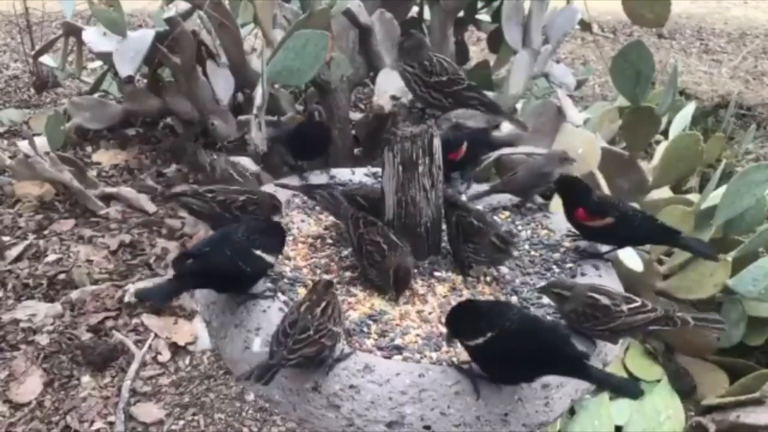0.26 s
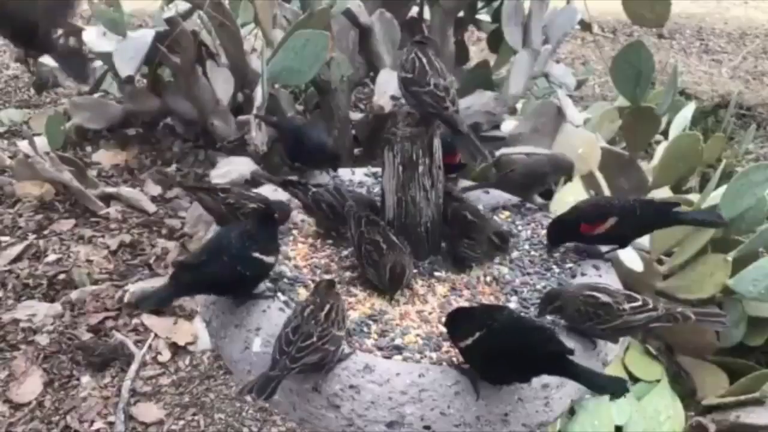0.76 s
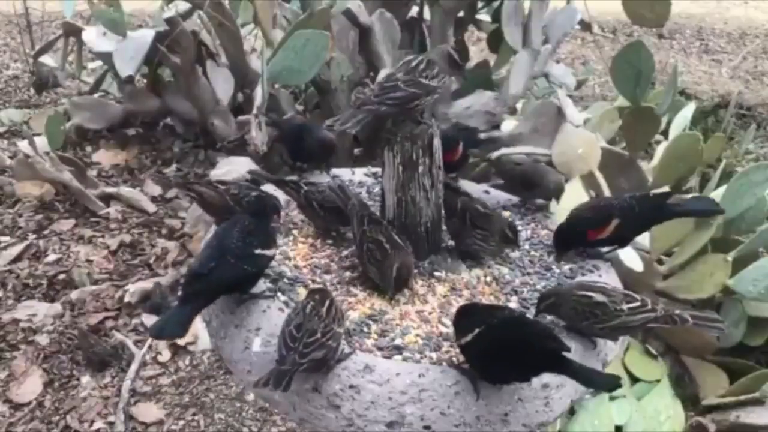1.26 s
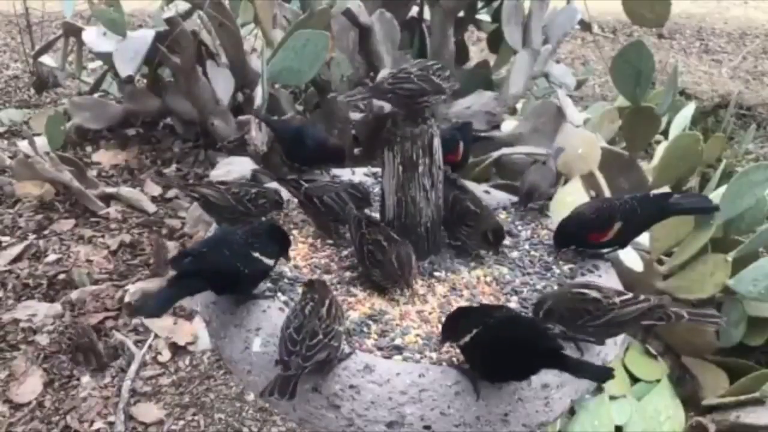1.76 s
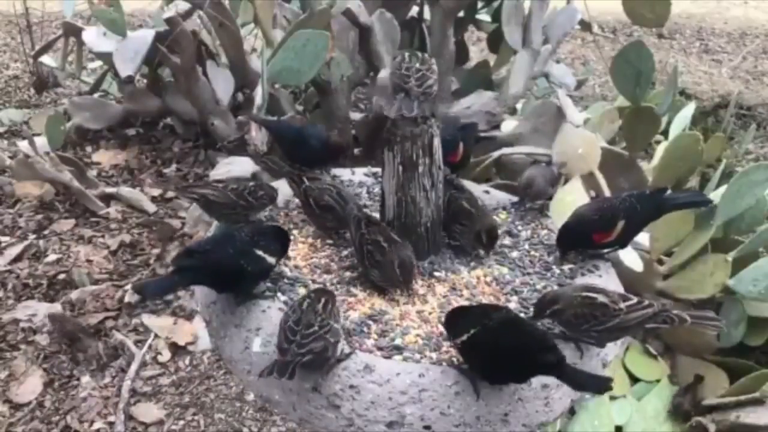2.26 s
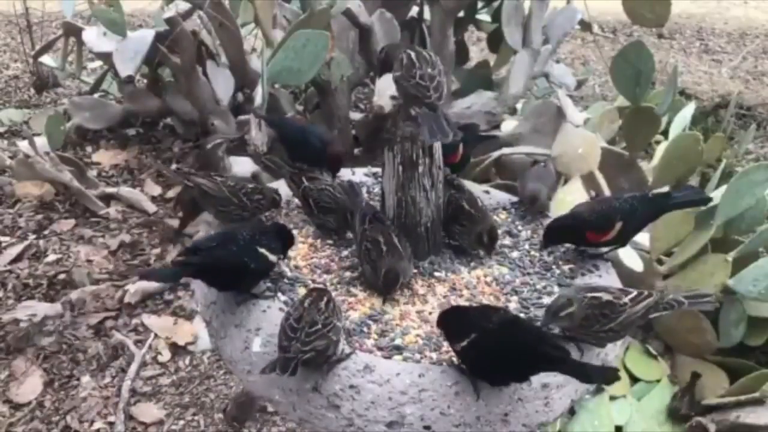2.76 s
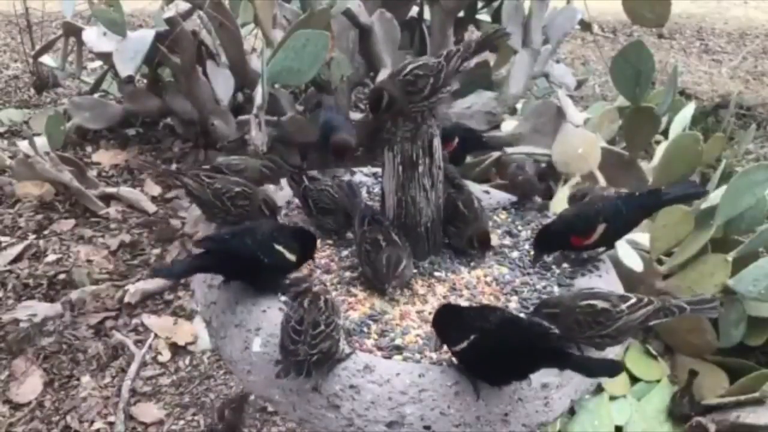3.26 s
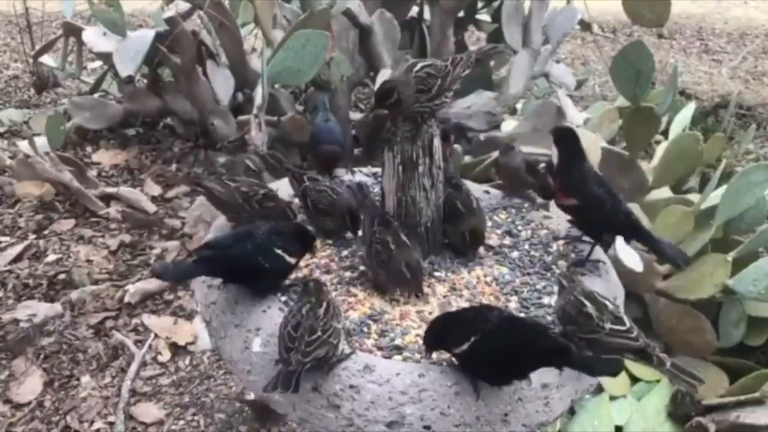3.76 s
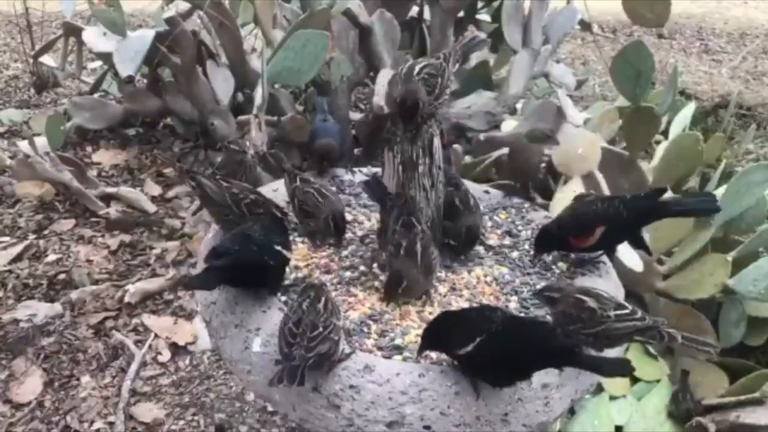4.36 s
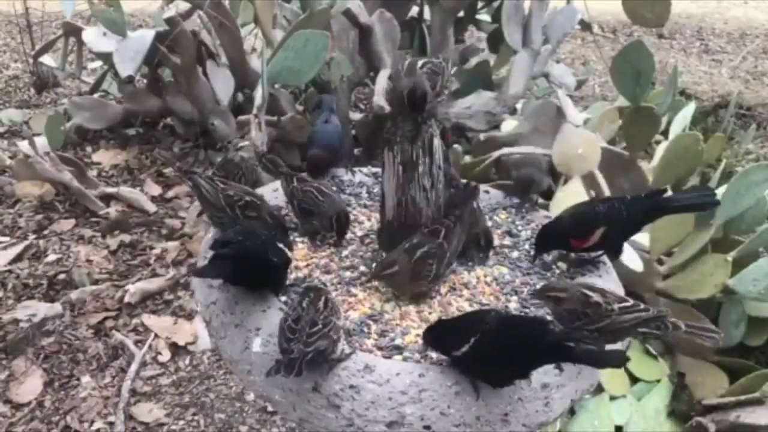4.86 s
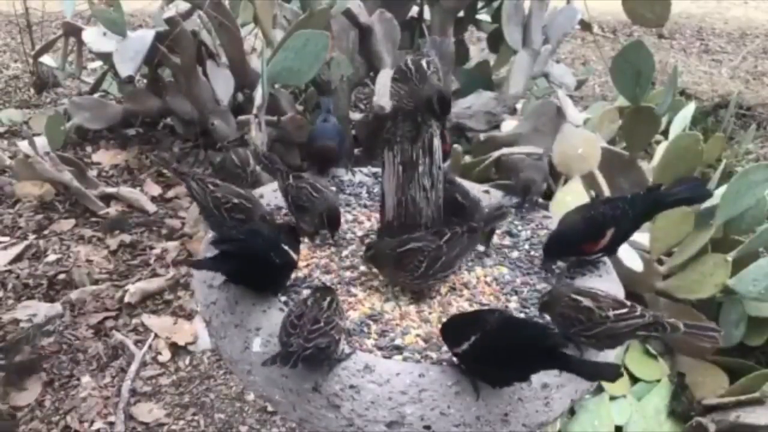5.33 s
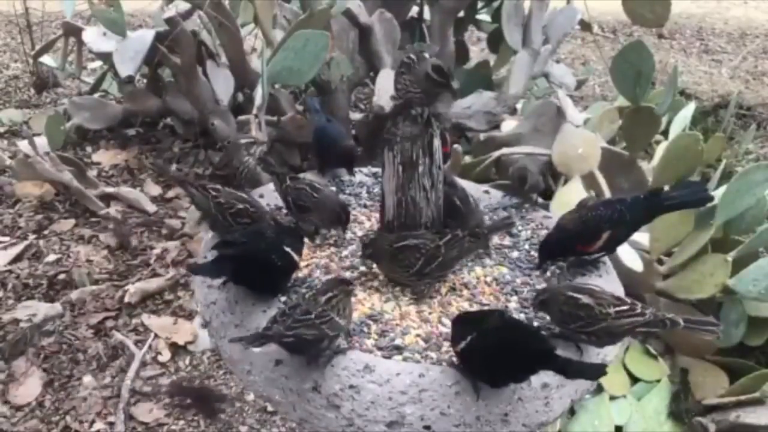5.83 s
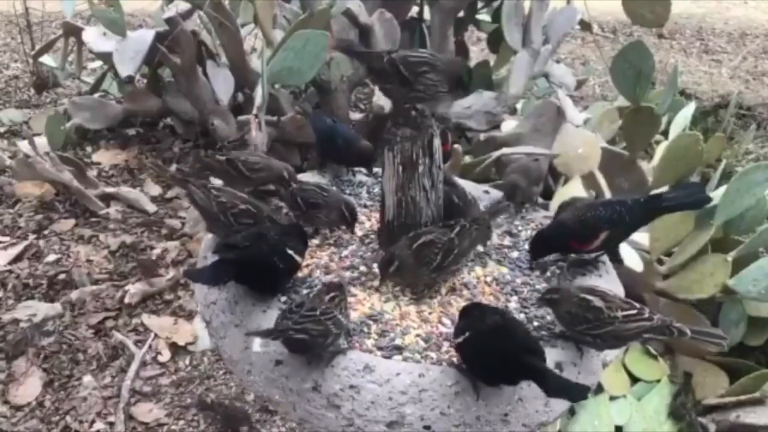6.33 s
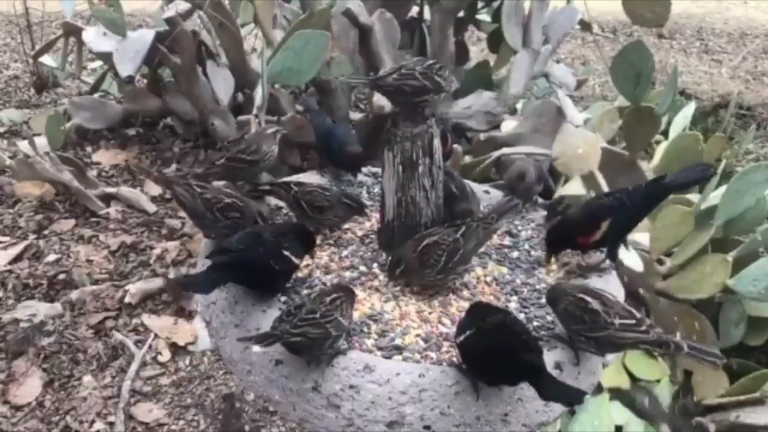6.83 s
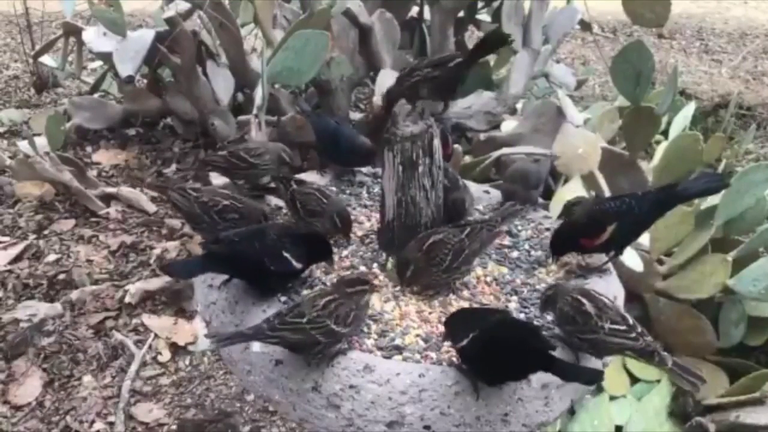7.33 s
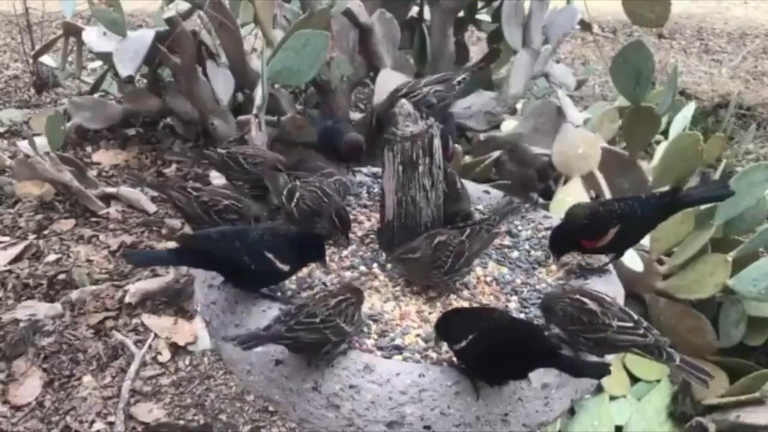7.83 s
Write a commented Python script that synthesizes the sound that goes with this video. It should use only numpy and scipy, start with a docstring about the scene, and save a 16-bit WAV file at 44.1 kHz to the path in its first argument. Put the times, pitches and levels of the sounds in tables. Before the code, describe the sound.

Close, dry taps of beaks and rustling seed as a flock of blackbirds feeds outdoors, with scattered chips and a few harsh calls.

```python
"""Outdoors, one microphone close to a stone bowl of seed where blackbirds feed, over a low rumble and hiss.
It opens on a sharp peck, a whistle and a flutter of wings; from there on beaks tap and crack husks, feet
shuffle the grain, short arched chips pass through the flock, and now and then a bird flutters again.
From about 3 s come harsh check calls, a thin whistle and, farther off, low trilled churrs.
Near 4 s the hum of a distant engine comes up and stays under the feeding to the end."""
import sys
import numpy as np
from scipy import signal
from scipy.fft import rfft, irfft, next_fast_len
from scipy.io import wavfile
from scipy.ndimage import map_coordinates

SR = 44100
rng = np.random.default_rng(int(sys.argv[2]) if len(sys.argv) > 2 else 0)


def file_out(sig):
    """Save sig as 16-bit WAV at sys.argv[1]."""
    # one column per channel
    cols = np.atleast_2d(sig).T
    # limit, then scale
    lim = np.clip(cols, -1, 1)
    pcm = np.round(lim * 32767).astype(np.int16)
    wavfile.write(sys.argv[1], SR, pcm)


N = 356769
TOP_HZ = 13250  # upper edge of the microphone's band

# Levels are relative: each source applies its own gain and envelope.
# loudest beak strikes, close up: t/s, level/dB, ring f/Hz, snap against ring/dB
BEAK_STRIKES = [(0.1267, -3, 3000, 8), (.207, -16, 5930, -9), (.430, -16.5, 4270, -13),
                (.782, -13.5, 3030, -5), (.807, -18, 12000, -4), (.961, -18, 3200, -6),
                (1.144, -12.5, 4300, 4), (1.472, -13, 6800, -3), (1.602, -15, 5600, 2),
                (2.193, -13, 5500, 0), (2.472, -9.5, 1690, 4), (2.544, -16, 11800, 13),
                (2.632, -15, 1810, 5), (2.696, -2.5, 2160, 4.5), (3.279, -7.5, 8400, -15),
                (3.659, -16, 2800, -4), (3.865, -13.5, 3980, -2), (3.904, -16, 4500, -4),
                (4.142, -6, 2320, 4), (4.199, -13, 9450, -11), (4.429, -7, 4100, -4),
                (4.486, -4, 4830, -29), (4.508, -10, 2370, 6), (4.662, -5.5, 3000, 12),
                (4.770, -12, 2180, 6), (5.304, -18.5, 3300, -17), (5.399, -8, 3700, -4),
                (5.783, -14, 3980, -4), (6.185, -10, 8900, -10), (6.313, -11.5, 3060, 2),
                (6.368, -8, 3300, -1), (6.588, -9.5, 1820, -4), (6.615, -14, 11700, 3),
                (6.721, -14, 4000, 7), (6.753, -12, 7900, -3), (6.779, -6, 1706, 18.5),
                (6.796, -5, 1910, 12), (6.977, -13.5, 4700, 8), (7.103, -9, 2160, -11),
                (7.275, -13, 5800, -2), (7.293, -8.5, 2380, 4), (7.329, -15, 2500, -4),
                (7.378, -12, 9800, 0), (7.423, -9, 3020, 3)]
# spectrum of a dry husk snapping: f/Hz, level/dB
HUSK_SPECTRUM = [(300, -22), (1500, 2), (4000, 10), (7000, 11.5), (9500, 16.5), (10800, -8), (12500, 25),
                 (13600, -22)]
# short arched chips: top t/s, top f/Hz, fall/s, level/dB, octave on the way up/dB, roughness/0-1
CHIP_CALLS = [(.571, 2770, 0.017, -34, -8, 0.67), (.643, 2570, 0.0091, -38.5, -7, 0.41),
              (1.035, 3500, 0.0031, -19, -11, .1), (1.218, 2700, .008, -37, -2, .4),
              (1.563, 2760, 0.0087, -34.5, -12, 0.54), (1.631, 3360, 0.014, -17.5, -17, 0.28),
              (2.215, 3730, 0.0073, -16, 8, 0.42), (2.489, 3020, 0.0068, -23.5, -17, 0.35),
              (2.822, 3210, .018, -19, -1, .5), (2.893, 3050, 0.017, -31, -3, 0.5),
              (3.038, 3410, 0.0057, -23, -10, .37), (3.615, 3510, 0.0043, -21, -6, 0.2),
              (3.680, 3190, .016, -24.5, 0, 0.54), (4.267, 2950, 0.021, -31, 1.5, .44),
              (4.427, 3250, 0.0054, -26.5, -11, 0.3), (4.829, 3090, 0.0044, -11.5, -23, 0.37),
              (5.221, 3190, 0.0042, -25, 0, 0.22), (5.475, 2580, 0.015, -27, -12, 0.32),
              (5.637, 2890, 0.023, -19, -27, 0.3), (6.466, 3090, 0.0169, -21, -12, 0.23),
              (6.577, 3035, 0.019, -17, -21, 0.39), (7.709, 2250, .012, -28, -1, 0.27),
              (8.028, 3080, 0.015, -26.5, -14, 0)]
# resonance of throat and beak in a chip: f/Hz, level/dB
CHIP_TRACT = [(700, -16), (1300, -0.5), (2000, -2.5), (2900, 2), (4500, -3.5), (6000, -7), (7500, -15),
              (12000, -7)]
# longer, harsh check calls: top t/s, top f/Hz, arch half-width/s, level/dB
CHECK_CALLS = [(2.955, 1493, 0.0055, -25.5), (3.176, 1467, 0.021, -12), (5.432, 1533, 0.022, -12),
               (5.899, 1497, 0.015, -27.5), (7.428, 1497, 0.0073, -22)]
# resonance of the throat with the beak open: f/Hz, level/dB
CHECK_TRACT = [(800, -34), (1700, -9), (2300, 1), (2950, 3.5), (3600, 5), (4500, 0.5), (5800, 1.5),
               (6700, -8), (9000, -13), (13000, -21)]
# whistles, silent if the end precedes the start:
# start t/s, turn t/s, end t/s, level/dB, start f/Hz, turn f/Hz, end f/Hz, quaver/dB
WHISTLE_NOTES = [(0.1573, .171, 0.18, -10.5, 4800, 5370, 4200, -0.5),
                 (.176, .184, .195, -27, 5400, 5350, 5250, 3),
                 (3.03, 3.066, 3.117, -32.5, 6860, 6100, 6300, 3.5),
                 (3.212, 3.238, 3.19, -32, 8750, 8760, 8880, 8.5)]
# churrs from farther off: start t/s, length/s, level/dB, f/Hz, harshness/dB, low body/dB
CHURR_CALLS = [(3.564, .1, -43.5, 1250, -3, 0), (3.956, 0.16, -34.5, 1228, 7, -22),
               (4.361, 0.14, -41, 1215, 2, -1), (4.686, .125, -35.5, 1372, -4, -2.5),
               (5.907, .118, -33.5, 1337, -5, -4), (7.139, 0.098, -30.5, 1376, -15, -10)]
# spectra of a churr's hiss and of its low body: f/Hz, level/dB
RASP_SPECTRUM = [(700, -31), (1100, -3), (1600, -7), (2200, -9), (2950, -2.5), (3500, -5), (4500, -4.5),
                 (6500, -14), (10000, -19)]
BODY_SPECTRUM = [(250, -12), (450, -7.5), (700, 1.5), (1100, -1), (1700, -9), (2200, -41)]
# short flutters: first wingbeat t/s, length/s, air push level/dB, feather swish level/dB
WING_FLUTTERS = [(0.117, .04, -26, -37), (0.269, 0.18, -26, -35.5), (0.969, 0.307, -34, -32.5),
                 (2.282, 0.19, -32, -38.5), (6.631, 0.4, -50, -38.5)]
# spectrum of swishing feathers: f/Hz, level/dB
FEATHER_SPECTRUM = [(100, 1), (220, 5), (450, -5.5), (1100, -0.5), (2500, -6.5), (6000, -19), (13000, -21)]
# how busily the flock shuffles the seed: t/s, level/dB
BUSTLE_LEVEL = [(0.0, -39), (0.2, -36.5), (0.52, -41), (1.06, -39), (1.35, -40), (3.2, -39), (3.42, -41.5),
                (3.87, -40), (4.08, -37.5), (4.6, -39.5), (4.82, -37.5), (5.11, -38.5), (5.9, -36.5),
                (6.51, -40), (7.01, -39.5), (7.23, -38.5), (7.61, -40), (8.09, -37.5)]
# feet scuffing in the bowl: t/s, half-length/s, level/dB
FOOT_SCUFFS = [(1.455, 0.024, -31.5), (1.731, 0.024, -32), (3.908, 0.0064, -31), (4.486, 0.007, -25.5),
               (4.7, 0.025, -29), (4.904, 0.061, -32.5), (6.205, .008, -36), (6.682, 0.0038, -34),
               (6.757, 0.013, -33.5), (6.976, 0.0078, -33.5), (7.325, 0.045, -27.5), (7.662, 0.033, -31.5)]
# spectrum of grains rubbing together: f/Hz, level/dB
GRAIN_SPECTRUM = [(180, -33), (300, -2), (363, -3), (475, -8), (801, -5), (909, -3), (1530, -1.5),
                  (4160, 0.5), (4950, 0), (5980, 1.5), (7580, -2), (8750, 2), (10600, -4.5), (12600, 3),
                  (13200, -6)]
# course of the low rumble, the open air and the distant engine: t/s, level/dB
RUMBLE_LEVEL = [(0, -37), (.4, -38.5), (1.1, -36), (1.55, -41), (2.0, -37.5), (2.18, -44.5), (2.35, -36),
                (3.2, -44), (3.83, -36), (4.3, -42), (5.0, -41), (5.8, -42.5), (6.3, -45.5), (7.12, -41),
                (7.64, -45), (8.09, -42.5)]
AIR_LEVEL = [(0, -51), (1.7, -56.5), (3.75, -55), (5.3, -65.5), (6.8, -47.5), (8.09, -51.5)]
ENGINE_LEVEL = [(0, -52.5), (3.6, -57.5), (4.1, -46.5), (4.9, -45.5), (6, -50.5), (6.6, -42.5), (8.09, -44)]
# spectra of the rumble and the open air: f/Hz, level/dB
RUMBLE_SPECTRUM = [(12, -40), (20, -31), (38, -1), (59, 0.5), (74, 0.5), (97, -6.5), (124, -9),
                   (146, -16.5), (260, -22), (340, -53), (570, -120)]
AIR_SPECTRUM = [(100, 3), (180, 2), (320, 1.5), (520, 0), (1000, -5.5), (2500, -24), (6000, -25)]
# decay of the yard's echo: f/Hz, t60/s
YARD_DECAY = [(200, 0.11), (3000, 0.11), (10000, 0.099)]


def pecks(ring_cycles=0.73, snap_s=0.00039, settle_s=0.02, settle_db=-27, gain_db=1,
          light_per_s=3, light_db=-19, light_hz=4200):
    """Close to the microphone a husk snaps, beak and seed ring for a cycle or two, and grains settle."""
    out, t = np.zeros(N), np.arange(1024) / SR
    light = []  # lighter pecks at random, all over the bowl
    for _ in range(round(light_per_s * N / SR)):
        s = rng.uniform(0, N / SR)
        db = light_db + 2 * rng.standard_normal()
        hz = min(light_hz * 2 ** (.6 * rng.standard_normal()), TOP_HZ)
        light.append((s, db, hz, 0))
    for s, db, hz, snap_db in BEAK_STRIKES + light:
        ring = np.sin(2 * np.pi * hz * t) * np.exp(-t * hz / ring_cycles) * (1 - np.exp(-t * hz)) ** 2
        snap = noise(HUSK_SPECTRUM, len(t)) * t / snap_s * np.exp(-(t / snap_s) ** 2)
        hit = ring / np.abs(ring).max() + amp(snap_db) * snap / np.abs(snap).max()
        settle = amp(settle_db) * noise(HUSK_SPECTRUM, len(t)) * np.exp(-t / settle_s)
        add(out, s, amp(db + gain_db) * (hit / np.abs(hit).max() + settle))
    return out


def chips(base_hz=1000, jitter=0.101, hiss_db=-4, tilt_db=-7, purer_db=11, tail_db=-15, tail_s=0.018,
          second_ratio=1.25, lead_s=0.00301, octave_top_hz=6500):
    """The pitch shoots up and drops, loudest at the top; the note grows purer and leaves a hoarse tail."""
    out, t = np.zeros(N), np.arange(-3072, 3072) / SR
    for s, top_hz, fall_s, db, octave_db, rough in CHIP_CALLS:
        # a chip that falls slowly also rises more slowly and arches wider
        rise_s, width_s = .014 + 0.63 * fall_s, .005 + 0.1107 * fall_s

        def arch(time):
            """Jittery pitch that peaks at time zero."""
            hz = base_hz + (top_hz - base_hz) / (1 + (time / width_s) ** 2)
            return hz * (1 + jitter * rough * wobble(595.7, len(t)))

        pitch = arch(t)
        tone = voice(pitch, CHIP_TRACT, tilt_db - purer_db * np.clip(t / width_s + 1, 0, 1))
        # the octave flares on the way up; the beak passes little of it above octave_top_hz
        flare = np.exp(-((t / width_s + 0.77) / 1.4) ** 2)
        beak_gain = amp(along(CHIP_TRACT, 2 * pitch)) / (1 + (2 * pitch / octave_top_hz) ** 10)
        octave = amp(octave_db) * flare * beak_gain * np.sin(2 * phase_of(pitch))
        # in rough notes the other side of the syrinx sounds too, higher and slightly ahead
        second_side = np.sin(phase_of(second_ratio * arch(t + lead_s)))
        tone += rough * second_side * np.exp(-((t + lead_s) / width_s / 2) ** 2)
        hiss = noise(CHIP_TRACT, len(t))
        tone = tone * (1 + rough * wobble(823, len(t))) + amp(hiss_db) * rough * hiss
        progress = np.clip(np.where(t < 0, t / rise_s, t / fall_s), -1, 1)
        effort = np.cos(np.pi / 2 * progress) ** 2 * (pitch / top_hz) ** 0.42
        tail = amp(tail_db) * np.sqrt(rough) * hiss * (t > 0) * np.exp(-np.abs(t) / tail_s)
        add(out, s + t[0], amp(db) * (effort * tone + octave + tail))
    return out


def checks(base_hz=860, jitter=.013, flutter=.27, hoarse_db=-9):
    """A flat-topped arch of pitch whose middle harmonics carry the call; it frays into hiss at the end."""
    out, t = np.zeros(N), np.arange(-4096, 4096) / SR
    for s, top_hz, width_s, db in CHECK_CALLS:
        u = t / width_s
        arch_hz = base_hz + (top_hz - base_hz) / (1 + np.abs(u) ** 2.1)
        pitch = arch_hz * (1 + jitter * wobble(511, len(t)))
        tone = voice(pitch, CHECK_TRACT, tilt_db=0) * np.exp(-(u / 0.96) ** 2)
        tone *= 1 + flutter * wobble(479, len(t))
        hiss = amp(hoarse_db) * noise(CHECK_TRACT, len(t)) * np.exp(-((u - 0.05) / 1.7) ** 2)
        onset = np.clip((u + 1.63) * 4, 0, 1)
        add(out, s + t[0], amp(db) * onset * (tone + hiss))
    return out


def voice(pitch, tract, tilt_db):
    """Seven harmonics light up as they sweep through the resonance of throat and beak."""
    k = np.arange(1, 8)[:, None]
    gains = amp(along(tract, k * pitch) + tilt_db * (k - 1)) * (k * pitch < TOP_HZ)
    loudest_rms = np.sqrt(np.sum(gains ** 2, axis=0).max() / 2)
    return np.sum(gains * np.sin(k * phase_of(pitch)), axis=0) / loudest_rms


def whistles(waver=0.012, overtone_db=-26, attack_s=.003, release_s=0.01):
    """Nearly pure high notes bend to a turning point, then slide; the thin ones quaver."""
    out = np.zeros(N)
    for start, turn, end, db, start_hz, turn_hz, end_hz, quaver_db in WHISTLE_NOTES:
        t = np.arange(start, end, 1 / SR)
        bend, slide = np.interp(t, [start, turn], [0, 1]), np.interp(t, [turn, end], [0, 1])
        hz = start_hz + (turn_hz - start_hz) * bend ** 2 + (end_hz - turn_hz) * slide
        phase = phase_of(hz * (1 + waver * wobble(450, len(t))))
        effort = np.clip(np.minimum((t - start) / attack_s, (end - t) / release_s), 0, 1)
        level = effort * amp(db + quaver_db * wobble(187, len(t)))
        add(out, start, level * (np.sin(phase) + amp(overtone_db) * np.sin(2 * phase)))
    return out


def churrs(trill_hz=84.1, depth=.2, jitter=.04, arch=0.38, sag=0.126, overtone_db=-17):
    """A farther bird trills a low, sagging note; each dip grates low, and pulsed hiss makes it harsh."""
    out, t = np.zeros(N), np.arange(8192) / SR
    for s, length, db, hz, harsh_db, body_db in CHURR_CALLS:
        u = np.clip(t / length, 0, 1)
        effort = np.abs(np.sin(np.pi * u ** 0.85)) ** 0.788
        trill = np.sin(phase_of(trill_hz * (1 + 0.063 * wobble(54, len(t)))))
        glide = arch * (effort - .8) - sag * (u - .5)
        vibrato = depth * (1 - u ** 4) * trill
        phase = phase_of(hz * (1 + vibrato + glide + jitter * wobble(820, len(t))))
        tone = unit((np.sin(phase) + amp(overtone_db) * np.sin(2 * phase)) * (1 + .25 * trill))
        hiss = amp(harsh_db) * noise(RASP_SPECTRUM, len(t)) * (1 + 0.34 * trill)
        body = amp(body_db) * unit(noise(BODY_SPECTRUM, len(t)) * (1 - trill) ** 2)
        add(out, s, amp(db) * effort * (tone + hiss + body))
    return out


def wings(wingbeat_s=.06, push_hz=62, push_s=0.014, swish_s=0.0098, taper_db=8):
    """Each downstroke pushes a low pulse of air and swishes the feathers, strongest in mid-flutter."""
    out, t = np.zeros(N), np.arange(-2048, 2048) / SR
    for start, length, push_db, swish_db in WING_FLUTTERS:
        beats = np.arange(start, start + length, wingbeat_s)
        for s in beats:
            effort = amp(-taper_db * (2 * (s - beats.mean()) / length) ** 2)
            push = amp(push_db) * np.sin(2 * np.pi * push_hz * t) * np.exp(-(t / push_s) ** 2)
            swish = amp(swish_db) * noise(FEATHER_SPECTRUM, len(t)) / (1 + (t / swish_s) ** 2)
            add(out, s + t[0], effort * (push + swish))
    return out


def shuffled_seed(fidget_db=1.5, hiss_db=2, rustle_db=-2, crunch_db=-7, crunch_s=0.0028):
    """Seed shifts in the bowl: a fine hiss, a rustle of grains, small crunches and the scuffs of feet."""
    t = np.arange(N) / SR
    bustle_db = curve(BUSTLE_LEVEL) + fidget_db * np.tanh(wobble(14, N))
    hiss = amp(hiss_db) * noise(GRAIN_SPECTRUM, N)
    clumps_db = 6.5 * np.tanh(wobble(60, N))
    rustle = amp(rustle_db + clumps_db) * colour(grains(per_s=4000, spread_db=6), GRAIN_SPECTRUM)
    # each crunch is a burst of contacts that dies in a few milliseconds
    triggers = np.abs(grains(per_s=40, spread_db=11.5))
    bursts = signal.fftconvolve(triggers, np.exp(-t[:1024] / crunch_s))[:N]
    crunches = amp(crunch_db) * colour(bursts * rng.standard_normal(N), GRAIN_SPECTRUM)
    footwork = sum(amp(db) * np.exp(-((t - s) / half_s) ** 2) for s, half_s, db in FOOT_SCUFFS)
    scuffs = footwork * colour(grains(per_s=4000, spread_db=9), GRAIN_SPECTRUM)
    return amp(bustle_db) * (hiss + rustle + crunches) + scuffs


def grains(per_s, spread_db):
    """Random tiny contacts, most weak and a few strong."""
    strength = amp(spread_db * np.minimum(rng.exponential(size=N), 2.6))
    return (rng.random(N) < per_s / SR) * strength * rng.choice([-1, 1], N)


def distant_engine(start_hz=121.8, sag_hz_per_s=0.4):
    """Far off, an engine hums one slightly unsteady note and slows very gradually."""
    hz = start_hz - sag_hz_per_s * np.arange(N) / SR
    sway_db, drift_hz = 1.3 * wobble(5, N), .4 * wobble(4, N)
    return amp(curve(ENGINE_LEVEL) + sway_db) * unit(np.sin(phase_of(hz + drift_hz)))


def open_air():
    """The bed of the place: a low rumble and a soft hiss, each rising and falling."""
    rumble = amp(curve(RUMBLE_LEVEL)) * noise(RUMBLE_SPECTRUM, N)
    return rumble + amp(curve(AIR_LEVEL)) * noise(AIR_SPECTRUM, N)


def yard_echo(x, early_s=0.011, late_db=-9, delay_s=.002):
    """Ground and cactus pads scatter the sound at once; a faint short tail follows."""
    hz, frame_s, spectra = signal.stft(rng.standard_normal(SR // 4), SR, nperseg=256)
    decay = amp(-60 * frame_s / along(YARD_DECAY, hz)[:, None])
    late = signal.istft(spectra * decay, SR, nperseg=256)[1]
    t = np.arange(len(late)) / SR
    early = rng.standard_normal(len(t)) * np.exp(-t / early_s)
    response = (unit(early) + amp(late_db) * unit(late)) * (t > delay_s)
    return signal.fftconvolve(x, response / np.linalg.norm(response))[:N]


def amp(db):
    """Decibels to gain."""
    return 10 ** (np.asarray(db) / 20)


def unit(x):
    """Scale to rms 1."""
    return x / np.sqrt(np.mean(x ** 2) + 1e-20)


def along(points, hz):
    """Read (f/Hz, value) points at hz, on a log frequency axis."""
    f, values = np.transpose(points)
    return np.interp(np.log(hz + 1), np.log(f + 1), values)


def curve(points):
    """One value per sample from (t/s, value) points."""
    return np.interp(np.arange(N) / SR, *np.transpose(points))


def wobble(per_s, size):
    """A smooth random curve with per_s knots a second."""
    knots = rng.standard_normal(int(size * per_s / SR) + 4)
    return map_coordinates(knots, [np.arange(size) * per_s / SR])


def colour(x, spectrum):
    """x through a (f/Hz, level/dB) spectrum, at rms 1."""
    m = next_fast_len(len(x) + 512)
    gain = amp(along(spectrum, np.fft.rfftfreq(m, 1 / SR)))
    return unit(irfft(rfft(x, m) * gain, m)[:len(x)])


def noise(spectrum, size):
    """Coloured noise of rms 1."""
    return colour(rng.standard_normal(size), spectrum)


def phase_of(hz):
    """Running phase of a moving pitch."""
    return 2 * np.pi * np.cumsum(hz) / SR


def add(track, s, x):
    """Mix x into the track from time s."""
    i = max(round(s * SR), 0)
    track[i:i + len(x)] += x[:max(N - i, 0)]


def scene(call_wet_db=-12, peck_wet_db=-15, churr_wet_db=-8, whistle_wet_db=-19):
    """Mono, from beside the bowl: near beaks are almost dry; the farther churrs carry most echo."""
    calls, taps, trills, notes = chips() + checks(), pecks(), churrs(), whistles()
    echo = yard_echo(amp(call_wet_db) * calls + amp(peck_wet_db) * taps
                     + amp(churr_wet_db) * trills + amp(whistle_wet_db) * notes)
    flock = calls + taps + trills + notes + echo + wings() + shuffled_seed()
    return (flock + distant_engine() + open_air())[None]


def record(dry, edge_hz=150):
    """The microphone chain keeps nothing above its band limit."""
    m = next_fast_len(N + 4096)
    hz = np.fft.rfftfreq(m, 1 / SR)
    passband = np.clip((TOP_HZ - hz) / edge_hz, 0, 1)
    return irfft(rfft(dry, m) * passband, m)[..., :N]


dry = scene()
out = record(dry)
file_out(out)
```